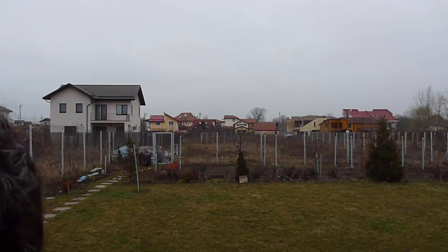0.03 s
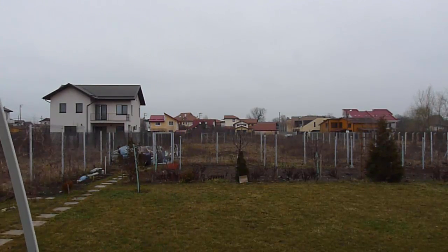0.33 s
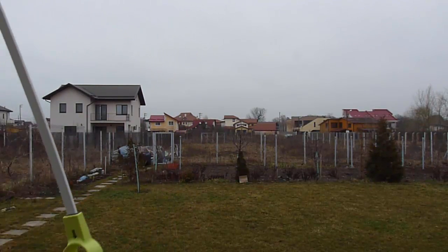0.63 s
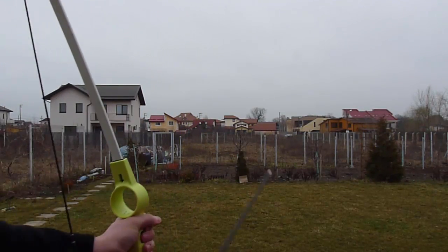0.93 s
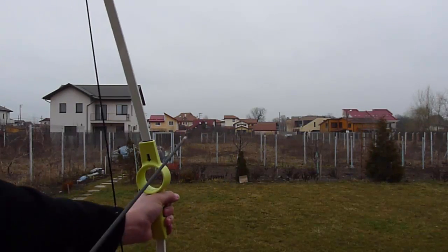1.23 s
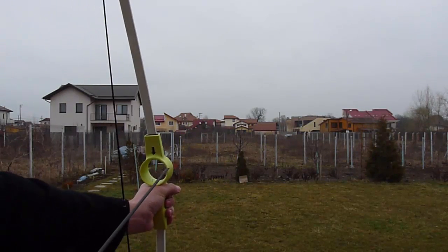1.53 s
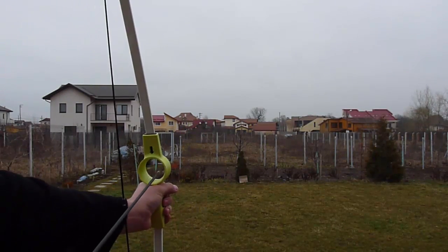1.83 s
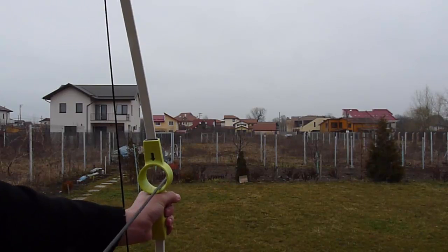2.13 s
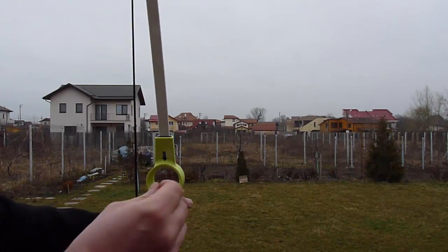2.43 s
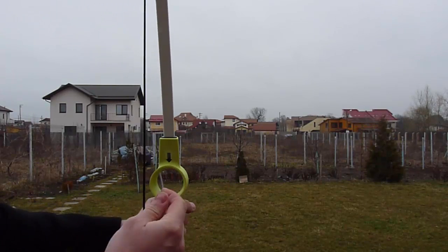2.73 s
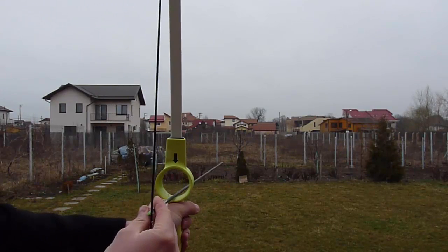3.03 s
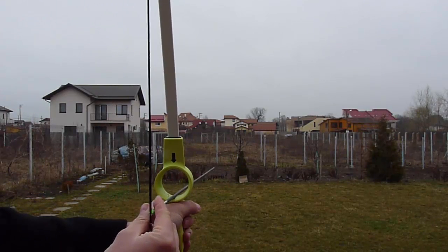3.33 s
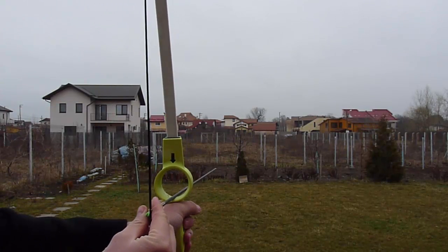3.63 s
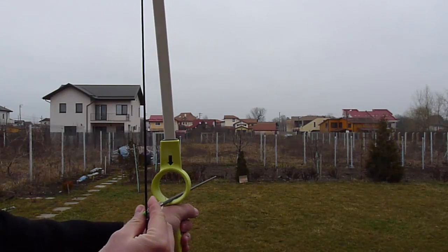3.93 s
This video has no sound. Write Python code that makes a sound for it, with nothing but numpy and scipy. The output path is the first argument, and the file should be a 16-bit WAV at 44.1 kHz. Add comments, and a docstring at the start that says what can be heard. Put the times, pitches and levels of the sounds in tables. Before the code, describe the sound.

Wind buffets the microphone in uneven gusts while an arrow clicks lightly against a bow.

```python
"""Gusts of wind rumble and thump on a small camera microphone in an open yard.
Meanwhile an archer lays an arrow on a bow: it taps the plastic rest, rubs as it slides through,
and twice nudges the bow into a faint ringing. Behind it all are a distant rush of air
and the recorder's own hiss, thin whine and two tiny ticks."""
import sys
import numpy as np
from scipy.fft import rfft, irfft, next_fast_len
from scipy.io import wavfile
from scipy.ndimage import uniform_filter1d, minimum_filter1d, map_coordinates

SR = 44100
rng = np.random.default_rng(int(sys.argv[2]) if len(sys.argv) > 2 else 0)


def dump(signal):
    """Clip the signal to [-1, 1] and save it as 16-bit WAV at the path in sys.argv[1]."""
    limited = np.clip(np.atleast_2d(signal).T, -1, 1)
    pcm = np.round(limited * 32767).astype(np.int16)
    wavfile.write(sys.argv[1], SR, pcm)


N = 176400  # 4 seconds

# how hard the wind blows at the microphone: t/s, level/dB
WIND_STRENGTH = [(0.0, -53), (0.56, -50.5), (0.63, -37), (0.8, -42), (0.83, -31.5), (0.99, -32.5),
                 (1.1, -35), (1.12, -29), (1.19, -27), (1.31, -50), (1.5, -47), (1.55, -30), (1.58, -53.5),
                 (1.69, -27.5), (1.71, -21.5), (1.85, -16), (1.87, -24), (1.92, -15), (1.97, -31.5),
                 (2.055, -26.5), (2.08, -18.5), (2.105, -30.5), (2.125, -16), (2.37, -25.5), (2.57, -50.5),
                 (2.7, -45.5), (2.74, -27.5), (2.78, -40.5), (2.91, -26), (3.11, -30), (3.17, -36.5),
                 (3.25, -31), (3.29, -39.5), (3.32, -27), (3.38, -43), (3.49, -29), (3.6, -37),
                 (3.635, -22), (3.69, -42), (3.78, -47), (3.8, -21), (3.86, -26), (4.0, -15.5)]
FULL_GUST_DB = -15.5
# tone colour of the arrow touching its rest: f/Hz, relative level/dB
CONTACT_COLOUR = [(500, -8), (1300, -3.5), (1900, -.5), (3050, 0), (3600, -5), (6000, -18)]


def buffeting(mild_gust_db=-34, deep_hz=99):
    """Air swirling at the microphone's opening makes a lumpy rumble; hard gusts add a ragged flutter."""
    # tone colours of the rumble and the flutter: f/Hz, relative level/dB
    rumble_colour = [(20, -10.5), (50, 1.5), (80, 4), (115, 4), (170, 1.5), (230, -4), (310, -12),
                     (420, -16.5), (900, -71.5)]
    flutter_colour = [(100, -15.5), (270, 3), (380, 2.5), (530, -0.5), (950, -14), (1600, -27.5),
                      (2400, -41), (4000, -70)]
    gust_db = curve(WIND_STRENGTH)
    lumps = steadied(wobble(90), size=3000)
    swirl = steadied(noise(rumble_colour), size=900)
    # hard gusts sound tighter: the deep bass grows less than the rest
    deep = filtered(swirl, lambda hz: 1 / (1 + (hz / deep_hz) ** 4))
    deep_gain = amp(-.55 * np.maximum(gust_db - mild_gust_db, 0))
    rumble = (swirl - deep + deep * deep_gain) * amp(gust_db - 1.5 + 3.5 * lumps)
    ragged = steadied(lumps + wobble(190), size=2000)
    flutter_db = -38.5 + (gust_db - FULL_GUST_DB) + 6 * ragged
    return rumble + steadied(noise(flutter_colour), size=600) * amp(flutter_db)


def eddies(full_gust_hz=191, db_per_octave=19, low_cut_hz=102.5, low_cut_q=1.1):
    """Each whirl of air gives one push and pull of pressure, which swings on in the bass-cut filter."""
    # large whirls that thump the microphone: t/s, peak before the filter/dB
    whirls = [(0.661, -27.5), (0.841, -22), (0.892, -23), (0.97, -19.5), (1.133, -15.5), (1.18, -16.5),
              (1.221, -20), (1.719, -17), (1.737, -21.5), (1.762, -13.5), (1.829, -11.5), (1.847, -10.5),
              (1.916, -11), (2.083, -9.5), (2.126, -11), (2.144, -8), (2.198, -16), (2.297, -15),
              (2.461, -27.5), (2.92, -19), (3.027, -27.5), (3.248, -21), (3.492, -15), (3.798, -6.5),
              (3.827, -15.5), (3.921, -10), (3.975, -13.5)]
    # sharp spits where the flow breaks at the opening's edge: t/s, peak before the filter/dB, f/Hz
    spits = [(1.1773, -29, 440), (1.735, -31, 500), (1.795, -35, 600), (1.829, -29, 580),
             (1.848, -31.5, 620), (1.913, -29.5, 520), (2.082, -22, 480), (2.1338, -19.5, 740),
             (2.187, -32, 620), (2.2, -25, 580), (2.373, -33, 520), (3.797, -13, 402), (3.919, -30.5, 800),
             (3.973, -22, 400)]
    pressure, t = np.zeros(N), np.arange(N) / SR
    # in a harder gust the whirls pass faster, so they sound higher
    octaves = (curve(WIND_STRENGTH) - FULL_GUST_DB) / db_per_octave
    thumps = [(s, db, full_gust_hz * 2 ** octaves[round(s * SR)]) for s, db in whirls]
    for s, db, hz in thumps + spits:
        near = np.abs(t - s) < .03
        phase = 2 * np.pi * hz * (t[near] - s)
        pressure[near] -= amp(db) * phase * np.exp((1 - phase ** 2) / 2)
    return filtered(pressure, lambda f: -f * f / (low_cut_hz**2 - f * f + 1j * f * low_cut_hz / low_cut_q))


def arrow_taps(crack_fade_s=.0093, ring_fade_s=.034):
    """Each tap is a dry crack and a short ring whose pitch depends on where the shaft is struck."""
    # the arrow hitting its rest: t/s, crack before colouring/dB, ring/dB, ring f/Hz
    hits = [(1.988, -33, -45, 1990), (2.0047, -30.5, -50, 2130), (2.2045, -52, -41.5, 2140),
            (2.241, -48, -52, 2300), (2.254, -54, -46, 1870), (2.334, -55, -46.5, 1840),
            (2.34, -53.5, -51, 2420), (2.385, -52, -49, 1930), (3.0483, -51, -43, 1490),
            (3.6961, -33, -46, 1700), (3.7298, -45, -54, 1900)]
    cracks, rings, t = np.zeros(N), np.zeros(N), np.arange(SR // 5) / SR
    for s, crack_db, ring_db, hz in hits:
        add(cracks, s, amp(crack_db - 60 * t / crack_fade_s))
        add(rings, s, amp(ring_db - 60 * t / ring_fade_s) * np.sin(2 * np.pi * hz * t))
    cracks *= steadied(noise(CONTACT_COLOUR), size=50)
    return coloured(cracks, CONTACT_COLOUR) + rings


def arrow_slide(grainy_db=5):
    """Uneven rubbing on the rest makes the arrow's shaft ring."""
    # loudness of the slide: t/s, level/dB
    slide_level = [(2.17, -100), (2.22, -65), (2.39, -70), (2.5, -100)]
    # pitches at which the shaft rings: f/Hz, width/Hz, relative level/dB
    shaft_modes = [(1760, 110, 3.5), (2200, 250, 3.5), (2720, 160, -2)]
    friction = noise(CONTACT_COLOUR) * amp(grainy_db * wobble(120))
    return resonant(friction, shaft_modes) * amp(curve(slide_level))


def bow_ring(rise_s=.009, fade_s=.76):
    """The nudged bow rattles faintly at its own pitches and dies away."""
    # nudges to the bow: t/s, level/dB
    nudges = [(2.716, -42), (3.697, -39)]
    # pitches at which the bow rings: f/Hz, width/Hz, relative level/dB
    bow_modes = [(467, 34, -4.5), (579, 27, -1.5), (1683, 69, -18)]
    swell, t = np.zeros(N), np.arange(SR // 2) / SR
    for s, db in nudges:
        add(swell, s, amp(db - 60 * t / fade_s) * (1 - np.exp(-t / rise_s)))
    rattle = noise([(250, -3), (450, 1.5), (1900, -4.0), (3500, -12)])
    return swell * steadied(resonant(rattle, bow_modes), size=900)


def distant_air():
    """A soft rush of air around the yard brightens as it swells."""
    # loudness of the rush's high part: t/s, level/dB
    treble_level = [(0, -66), (.5, -60), (1.15, -61.5), (1.35, -60), (1.6, -59), (1.8, -67), (2.55, -68.5),
                    (3.15, -61), (3.5, -61.5), (4, -76)]
    # tone colours of its low and high parts: f/Hz, relative level/dB
    body_colour = [(110, 2.5), (380, -6), (550, -2), (780, -10), (1050, -10.5), (1500, -26), (3500, -49.5)]
    treble_colour = [(500, -18.5), (1100, -1), (1500, -1), (1950, -0.5), (2350, -9), (2900, -15.5),
                     (4500, -40)]
    treble_db = curve(treble_level)
    body_db = -49.5 + .62 * (treble_db - treble_db.mean())
    return noise(body_colour) * amp(body_db) + noise(treble_colour) * amp(treble_db)


def amp(db):
    """Turn decibels into a factor to multiply by."""
    return 10 ** (np.asarray(db) / 20)


def unit(x):
    """Scale x to an average strength (rms) of 1."""
    return x / np.sqrt(np.mean(x ** 2) + 1e-20)


def curve(rows):
    """Join (t/s, value) rows with straight lines, one value per sample."""
    return np.interp(np.arange(N) / SR, *np.transpose(rows))


def wobble(rate):
    """A smooth curve through `rate` random points a second."""
    points = rng.standard_normal(int(N * rate / SR) + 4)
    return map_coordinates(points, [np.arange(N) * rate / SR])


def filtered(x, response):
    """Multiply each frequency in x by response(frequency)."""
    size = next_fast_len(N + SR // 2)
    return irfft(rfft(x, size) * response(np.fft.rfftfreq(size, 1 / SR)), size)[:N]


def coloured(x, points):
    """Shape the tone of x with (f/Hz, level/dB) points."""
    f, db = np.transpose(points)
    return filtered(x, lambda hz: amp(np.interp(np.log(hz + 1), np.log(f + 1), db)))


def noise(points):
    """Noise of strength 1 with the given tone colour."""
    return unit(coloured(rng.standard_normal(N), points))


def resonant(x, modes):
    """Let x ring at (f/Hz, width/Hz, level/dB) modes, then scale it to strength 1."""
    def response(f):
        return sum(amp(db) * 1j * f * width / (hz * hz - f * f + 1j * f * width)
                   for hz, width, db in modes)
    return unit(filtered(x, response))


def steadied(x, size):
    """Even out the chance swells of a noise over `size` samples."""
    power = uniform_filter1d(uniform_filter1d(x ** 2, size), size // 2)
    return x / np.sqrt(np.abs(power) + .02)


def add(track, s, sound):
    """Mix a sound into the track, starting at s seconds."""
    part = track[round(s * SR):][:len(sound)]
    part += sound[:len(part)]


def scene():
    """Wind, arrow and bow at one microphone."""
    return (buffeting() + eddies() + distant_air() + arrow_taps() + arrow_slide() + bow_ring())[None]


def record(dry, limit_db=-11.5, reaction_s=.003, hiss_db=-63, top_hz=15300):
    """The recorder holds down the hardest gusts, adds hiss, whine and ticks, and dulls the treble."""
    # the recorder's thin whine: f/Hz, level/dB
    whine_tones = [(6665, -88.5)]
    # how its treble falls away: f/Hz, gain/dB
    treble_loss = [(6700, 0), (7100, -4), (7500, -13), (8000, -23), (8600, -36)]
    # its tiny ticks: t/s, level before the cut at top_hz/dB
    ticks = [(0.0593, -42.5), (2.0593, -34.5)]
    size = round(reaction_s * SR)
    safe_gain = np.minimum(1, amp(limit_db) / (np.abs(dry[0]) + 1e-9))
    held_gain = minimum_filter1d(safe_gain, 2 * size)
    limited = dry[0] * uniform_filter1d(uniform_filter1d(held_gain, size), size)
    t = np.arange(N) / SR
    whine = sum(np.sqrt(2) * amp(db) * np.sin(2 * np.pi * hz * t) for hz, db in whine_tones)
    hiss = amp(hiss_db) * rng.standard_normal(N)
    mix = coloured(limited + whine + hiss, treble_loss)
    for s, db in ticks:
        add(mix, s, amp([db]))
    return filtered(mix, lambda hz: hz < top_hz)[None]


dry = scene()
out = record(dry)
dump(out)
```